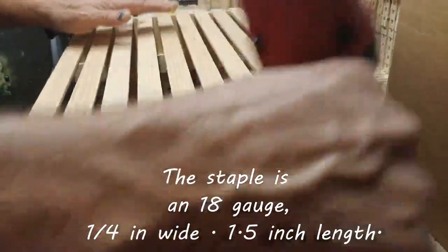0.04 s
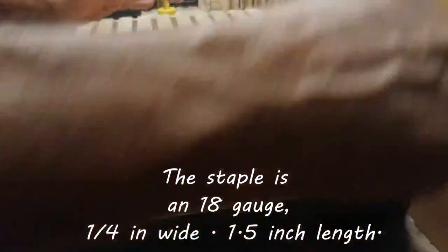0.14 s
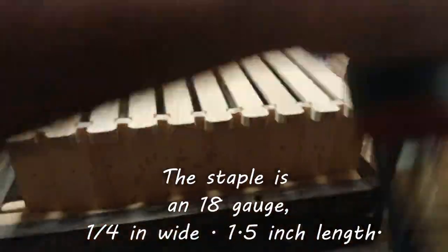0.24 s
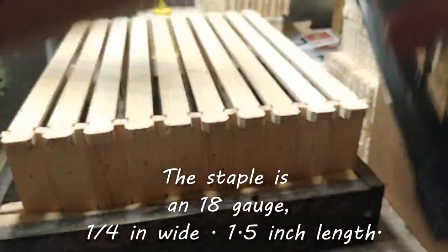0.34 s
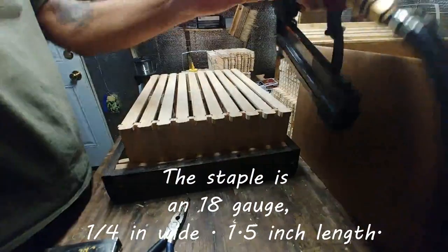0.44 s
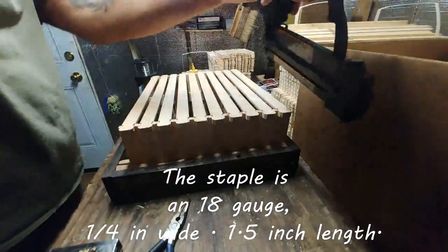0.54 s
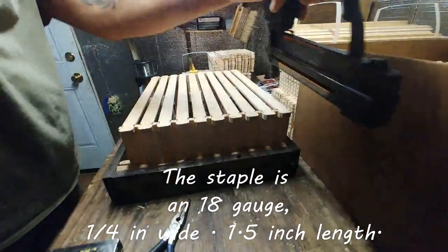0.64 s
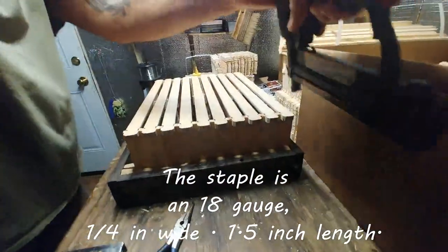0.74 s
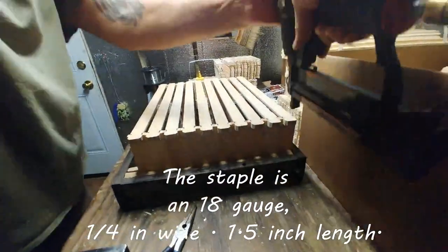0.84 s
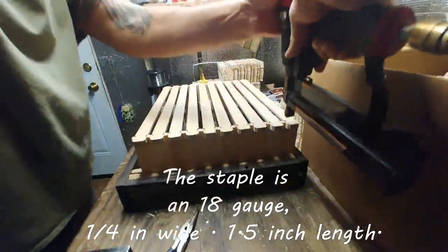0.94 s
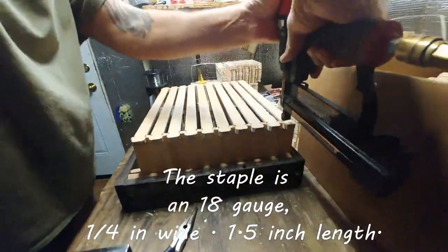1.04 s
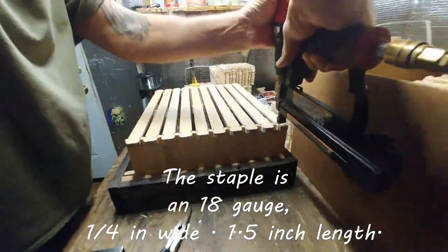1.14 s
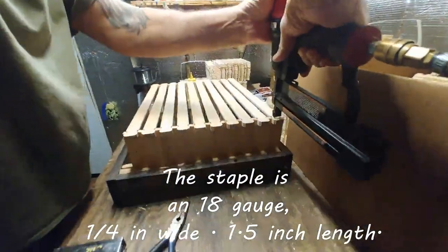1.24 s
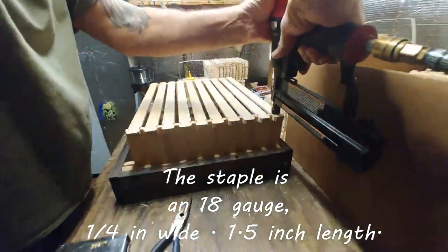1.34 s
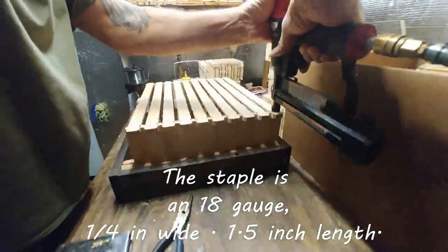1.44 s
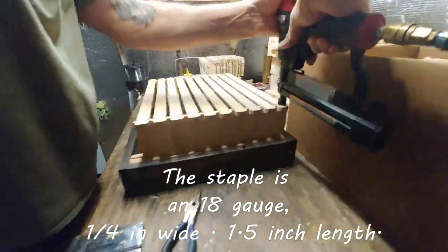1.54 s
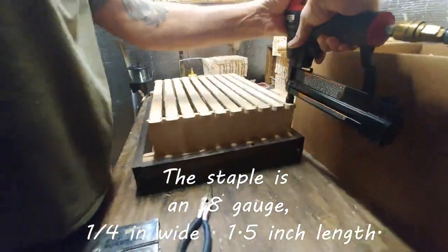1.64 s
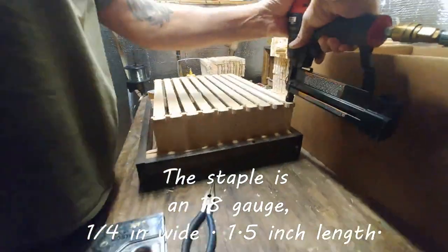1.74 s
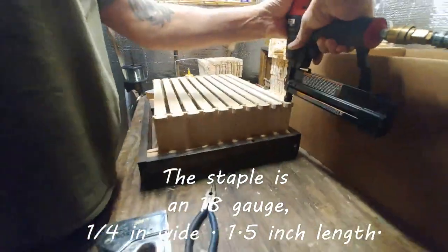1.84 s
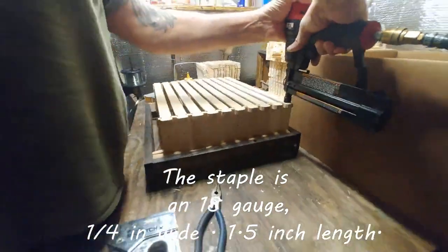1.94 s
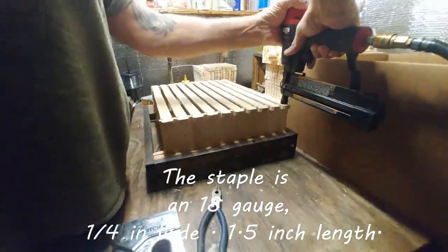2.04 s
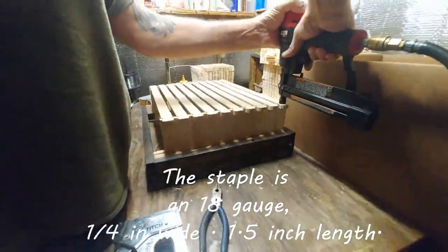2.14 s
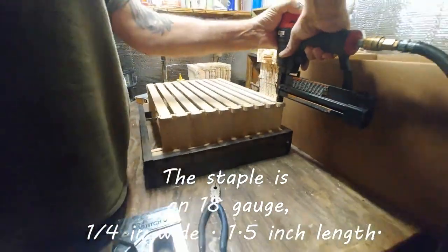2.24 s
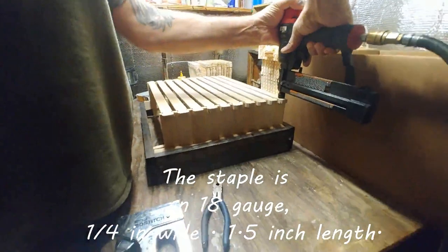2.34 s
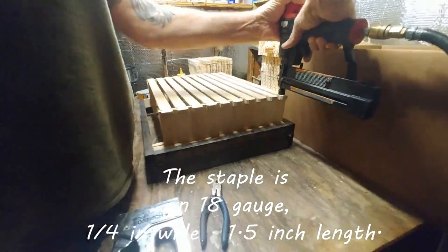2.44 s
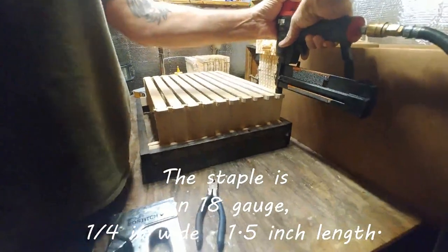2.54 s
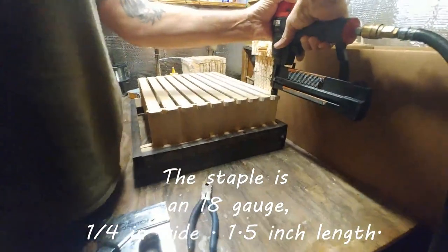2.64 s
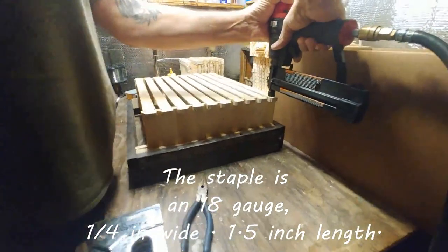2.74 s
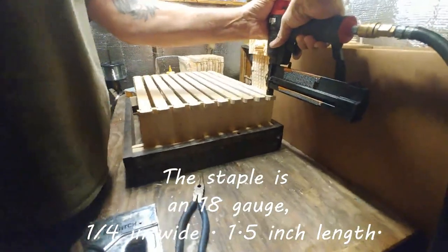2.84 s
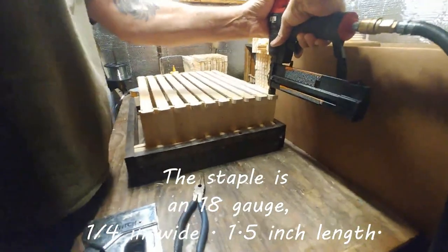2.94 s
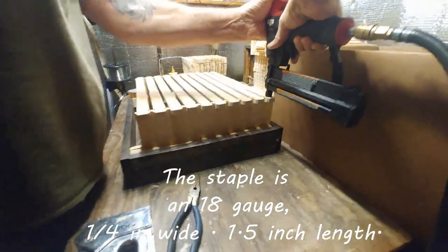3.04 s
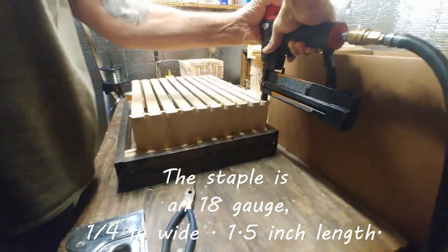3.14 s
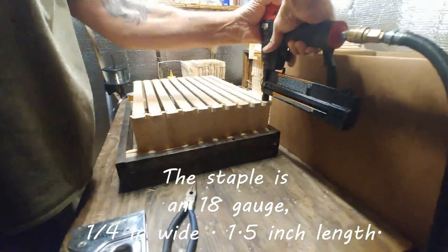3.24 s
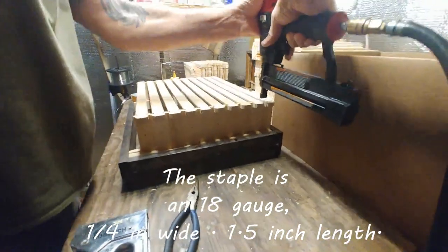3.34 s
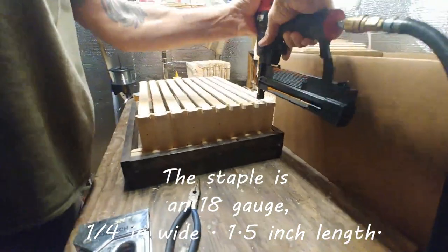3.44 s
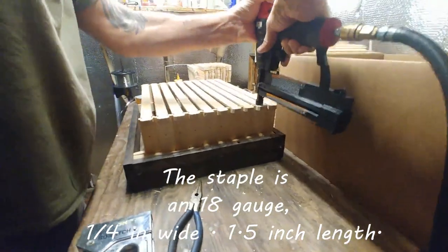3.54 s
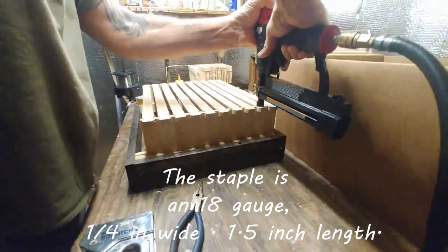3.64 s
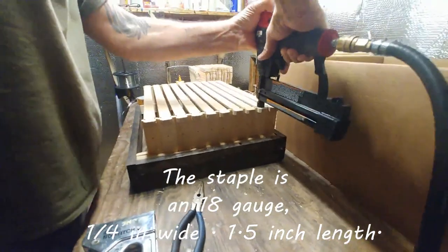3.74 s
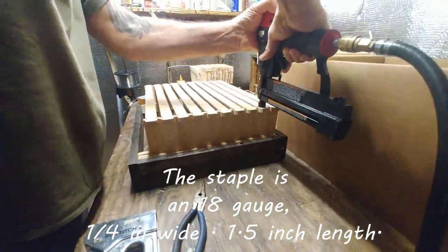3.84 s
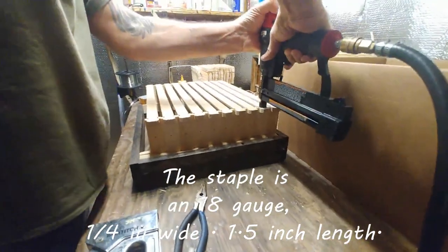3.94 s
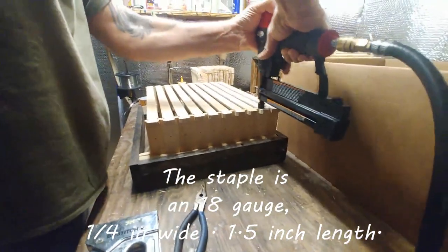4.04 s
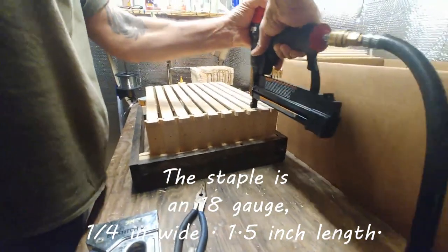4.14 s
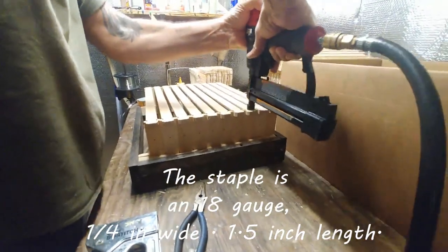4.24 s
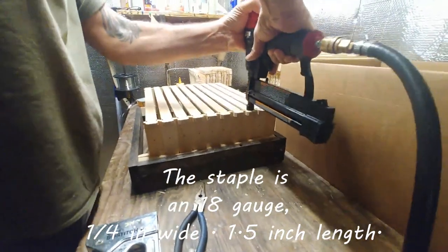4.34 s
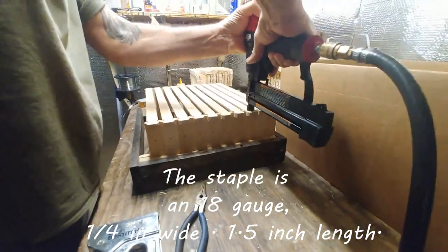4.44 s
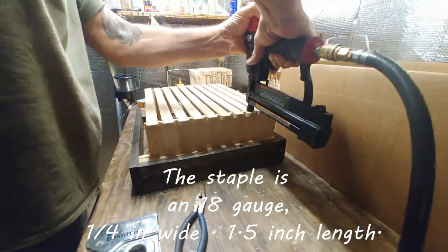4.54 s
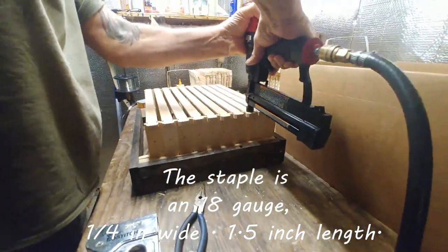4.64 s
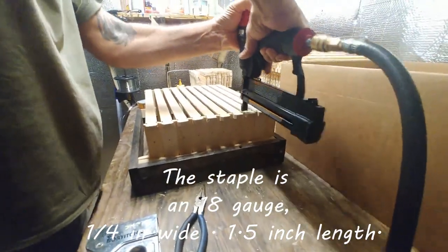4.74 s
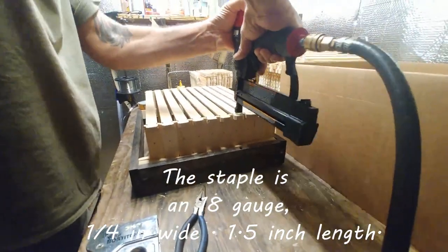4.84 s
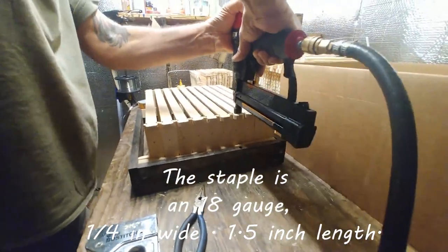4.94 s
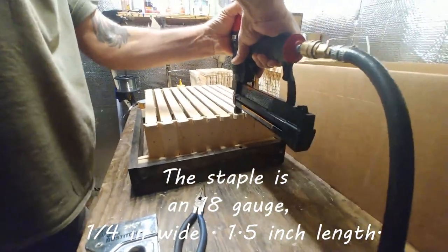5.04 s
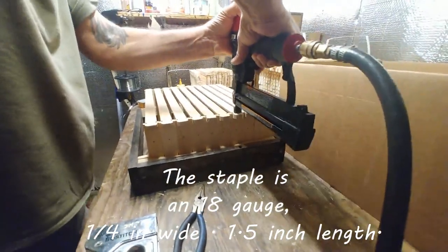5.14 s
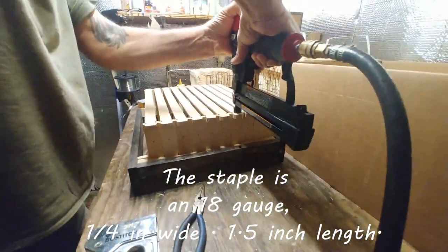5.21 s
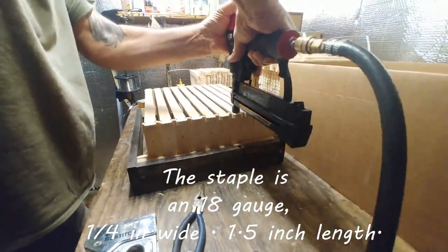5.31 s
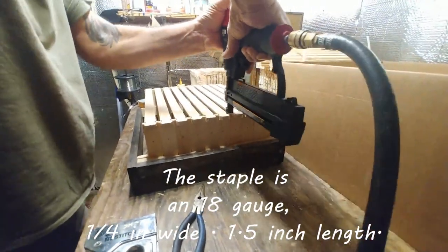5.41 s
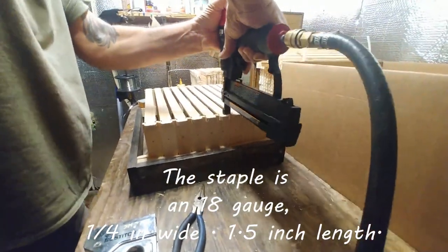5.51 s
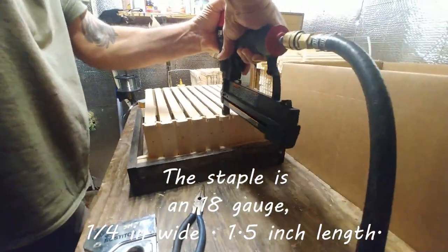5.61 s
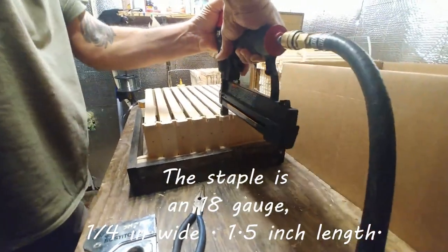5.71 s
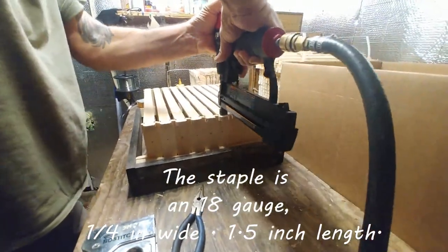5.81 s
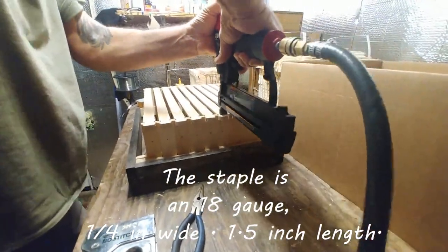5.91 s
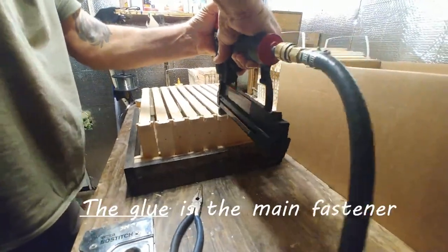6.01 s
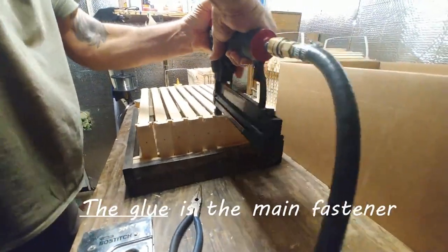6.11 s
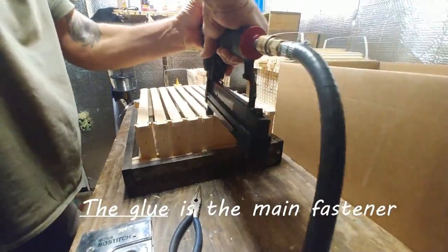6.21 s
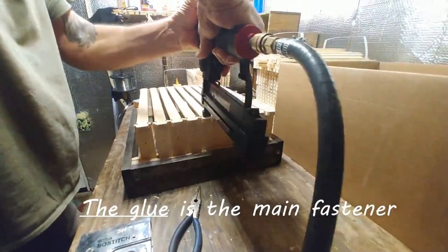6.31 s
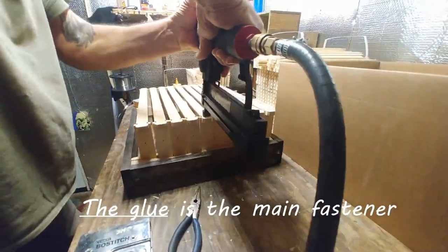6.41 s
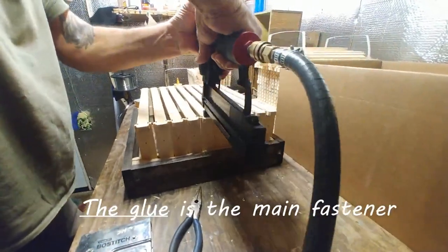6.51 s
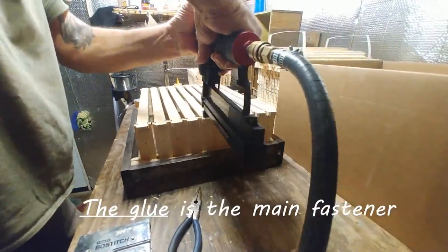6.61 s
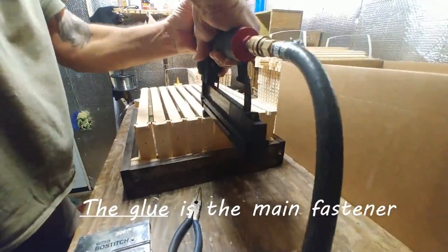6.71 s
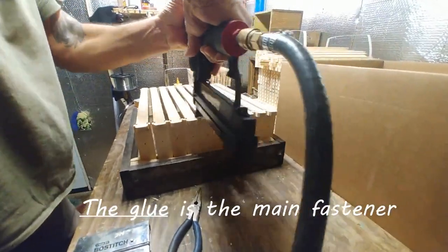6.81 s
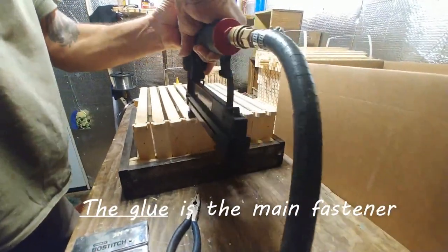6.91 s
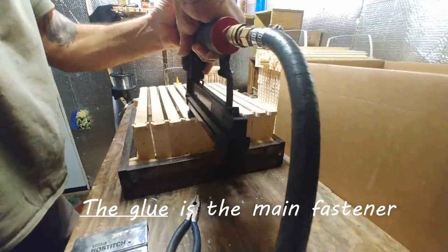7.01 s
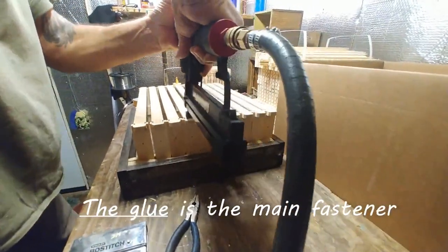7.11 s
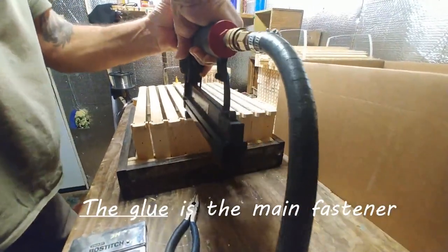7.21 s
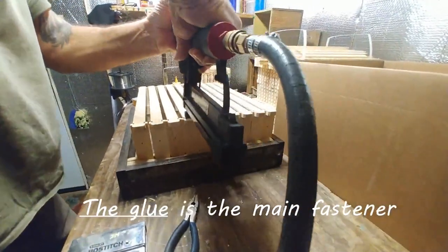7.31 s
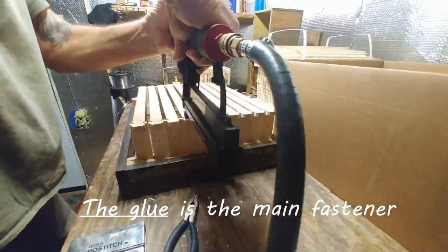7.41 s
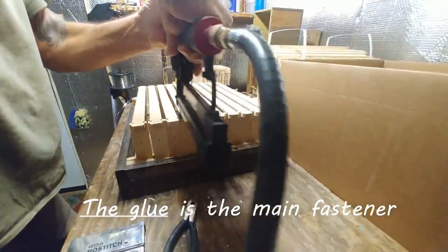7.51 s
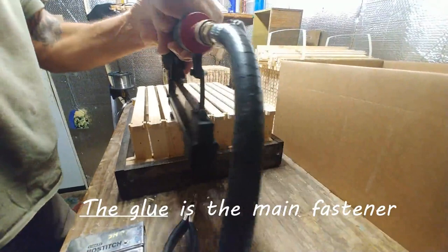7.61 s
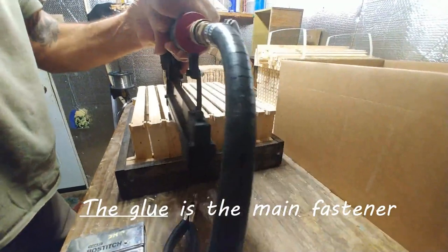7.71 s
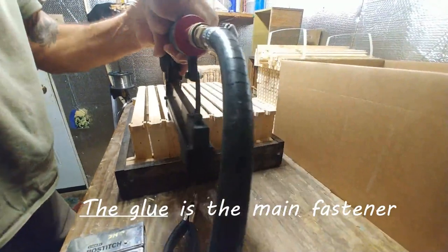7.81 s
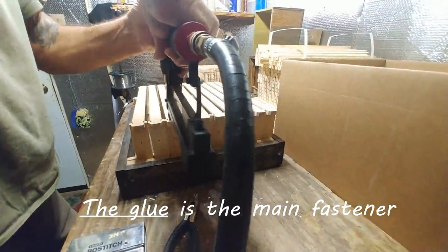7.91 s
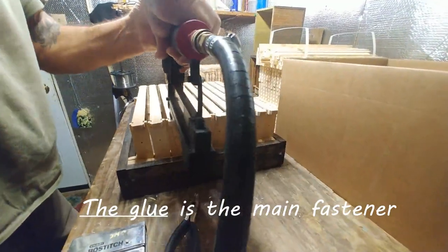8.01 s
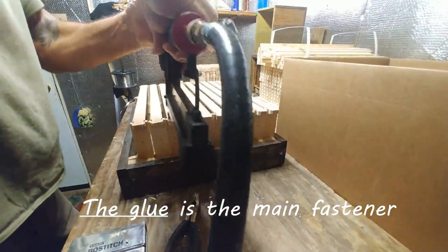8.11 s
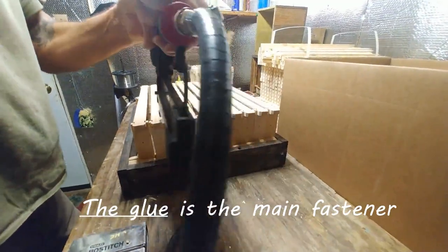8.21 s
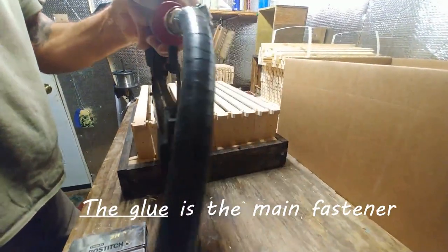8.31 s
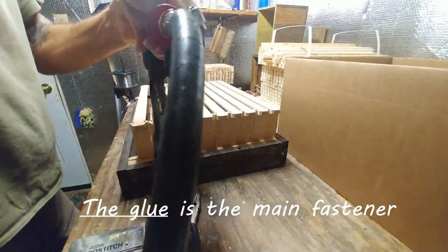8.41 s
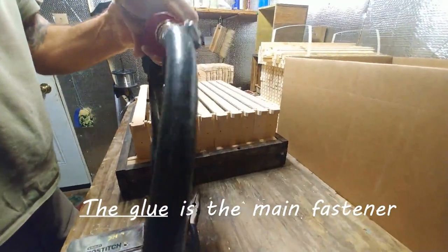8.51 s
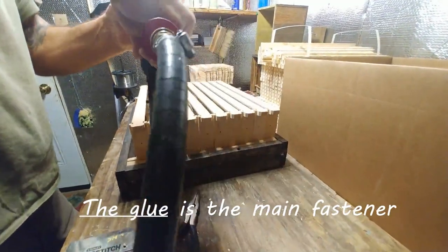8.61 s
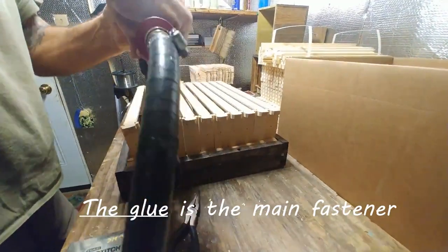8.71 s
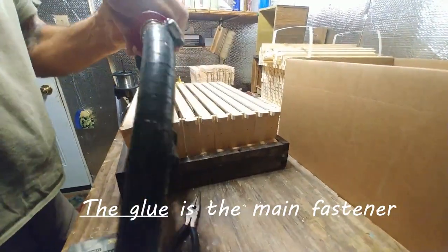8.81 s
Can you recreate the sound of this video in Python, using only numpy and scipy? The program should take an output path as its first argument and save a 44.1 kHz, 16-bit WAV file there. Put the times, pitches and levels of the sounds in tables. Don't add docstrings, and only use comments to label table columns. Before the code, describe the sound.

A heavy tool drags and bumps on a wooden bench, then nine sharp compressed-air staple shots crack into wood, each followed by a short exhaust hiss.

```python
import sys
import numpy as np
from scipy import signal
from scipy.fft import rfft, irfft, next_fast_len
from scipy.io import wavfile

SR = 44100
rng = np.random.default_rng(int(sys.argv[2]) if len(sys.argv) > 2 else 0)


def attenuation_scalar(level_db):
    decades = np.asarray(level_db, float) / 20
    return 10 ** decades


def pcm_store(signal):
    levels = np.round(np.clip(np.atleast_2d(signal), -1, 1) * 32767)
    wavfile.write(sys.argv[1], SR, levels.astype(np.int16).T)


N = 390726

# freq_hz, level_db_per_hz
SHOP_SPECTRUM = [(15, -25.5), (25, -6), (183, -17), (278, -19.5), (548, -24), (593, -21.5), (712, -29),
                 (770, -20.5), (833, -27.5), (5340, -39), (6580, -53), (8330, -47), (13000, -61.5)]
# freq_hz, width_hz, level_db
HUM_BANDS = [(67.4, 14, 2.5), (129, 13, -1.5)]
# time_s, rumble_db
BENCH_LOAD = [
    (0.0, -49.5),
    (0.9, -45),
    (1.1, -60),
    (1.83, -64.5),
    (2.37, -56.5),
    (8.86, -60),
]
# time_s, rub_db
DRAGS = [
    (0.0, -63),
    (0.136, -52.5),
    (0.33, -48),
    (0.405, -41),
    (0.45, -53.5),
    (0.6, -63.5),
    (0.7, -51),
    (0.998, -52.5),
    (1.07, -76),
]
# freq_hz, level_db_per_hz
RUB_SPECTRUM = [(300, -29), (560, -21.5), (750, -10.5), (980, -17.5), (1200, -8.5), (2150, 0), (2800, -8),
                (3400, -3), (3800, -9.5), (4800, -3.5), (6500, -23.5), (7800, -14.5), (11800, -34.5),
                (12800, -62.5)]
# freq_hz, level_db_per_hz
RUMBLE_SPECTRUM = [(15, -42.5), (25, -14.5), (157, 7), (216, -9.5), (338, -4.5), (385, -11.5), (439, -4.5),
                   (1190, -16), (2200, -38), (2860, -53), (4840, -120)]
# freq_hz, width_hz, level_db
SQUEAK_LINES = [(1387, 50, -13), (2223, 28, 1), (2750, 52, -6.5), (3050, 60, -7), (4610, 40, -22),
                (5240, 38, -16)]
# start_s, level_db, pitch_hz, length_s
CREEPS = [(2.19, -59, 2000, 0.065), (5.66, -67, 2300, 0.041), (5.745, -64, 900, .05),
          (5.745, -71, 4600, .04), (5.885, -59, 2300, 0.027), (7.92, -51.5, 800, 0.043),
          (7.93, -69, 2800, 0.021)]
# time_s, tick_peak_db, knock_db, knock_hz, left_right_db
HANDLING = [(0.066, -37, -50.5, 101, 3.5), (0.0856, -38, -39.5, 138.6, -4), (0.249, -35.5, -34, 157, -13.5),
            (0.376, -32.5, -46.5, 448, 1), (0.392, -26, -45.5, 440, -0.5), (0.4104, -27.5, -59, 129, -6.5),
            (0.456, -40, -29, 364.5, -2.5), (0.4697, -43, -31.5, 158.3, 5),
            (0.5287, -46, -31.5, 159.4, 1.5), (0.6317, -40, -34, 413, 11.5),
            (0.709, -37.5, -35, 104.3, -12), (1.01, -35, -47.5, 120.4, 7), (1.21, -54, -61.5, 137.6, 7),
            (1.497, -50, -47, 442, -10)]
# time_s, tick_peak_db, knock_db, knock_hz
NUDGES = [(1.4564, -60, -49.5, 440), (2.0672, -28.5, -47.5, 534), (2.2759, -23.5, -31, 121.4),
          (2.2838, -26.5, -45, 302), (2.3074, -35, -52, 129), (2.5221, -24.5, -47.5, 780),
          (2.7581, -29, -41, 463), (2.7759, -30, -56, 450), (2.8385, -21.5, -56.5, 739),
          (2.8515, -32.5, -61, 172.3), (3.0665, -40.5, -39.5, 634), (3.0758, -39.5, -38, 431),
          (3.7913, -54.5, -40, 102), (3.8062, -61, -47, 126.2), (5.1613, -32.5, -40.5, 136),
          (5.1958, -41.5, -44, 401.7), (5.75, -54, -55.5, 118.4), (5.883, -51, -64.5, 299),
          (5.9043, -49.5, -55, 153.5), (5.939, -35.5, -37.5, 302.3), (5.952, -29, -41.5, 129),
          (6.5395, -40.5, -48, 101), (7.2554, -50.5, -47.5, 300.5), (7.3557, -55, -55, 174.4),
          (7.9892, -36, -43, 414), (8.5144, -38.5, -79.5, 132), (8.6063, -30.5, -40, 118.8),
          (8.6241, -32, -40.5, 484), (8.677, -41.5, -59, 300)]
# time_s, tick_peak_db, knock_db, knock_hz
LANDINGS = [(1.4749, -30, -43.5, 1250), (3.711, -44, -43.5, 130), (4.4836, -31.5, -30.5, 266),
            (4.5144, -30.5, -41.5, 134), (5.1412, -23, -33, 310), (5.9215, -19.5, -29.5, 102.5),
            (6.57, -24, -30.5, 162.2), (7.1989, -52, -55, 121.2), (7.9616, -23.5, -33, 320),
            (8.4961, -38, -44, 116.5)]
# time_s, tick_peak_db, tick_hz, knock_db
CATCHES = [(0.8, -25.5, 5710, -63), (1.6602, -62.5, 5600, -78), (1.8851, -55, 8350, -76.5),
           (1.4741, -32.5, 3250, -59), (1.995, -60, 5200, -75), (2.1392, -40.5, 5540, -60),
           (2.155, -56, 5400, -70.5), (2.268, -43, 7500, -68.5), (2.824, -40.5, 2860, -63),
           (2.9648, -58.5, 8070, -64.5), (2.978, -58.5, 5000, -61.5), (3.1074, -19, 7800, -51),
           (3.1622, -32, 3040, -55), (3.1704, -19, 3130, -41), (3.5874, -51, 4400, -65.5),
           (3.6394, -32.5, 3930, -45), (3.652, -42.5, 3820, -53), (3.693, -38, 5700, -52),
           (3.913, -31, 3060, -57), (4.3155, -29.5, 4190, -47), (4.998, -31, 3670, -46),
           (5.5755, -34, 1765, -53), (6.3600, -34, 3680, -51.5), (6.451, -51.5, 5480, -59.5),
           (6.527, -52, 4500, -70.5), (6.562, -49.5, 8500, -72), (6.586, -46, 8560, -71),
           (6.635, -45, 5500, -69), (7.269, -40, 3800, -62), (7.753, -34, 3600, -58.5),
           (7.9043, -57, 3580, -58.5)]
# freq_hz, level_db_per_hz
GRIT_SPECTRUM = [(150, -11), (1000, -1.5), (2500, 0.5), (5000, -1), (6500, -10), (8300, -8), (11500, -9.5),
                 (12600, -42.5)]
# freq_hz, width_hz, level_db
STEEL_LINES = [(1150, 120, -5), (2330, 510, -1.5), (3510, 360, -3), (4400, 420, -3.5), (5600, 520, 0.5),
               (8400, 500, -6.5), (9600, 500, -9.5)]
# freq_hz, level_db, t60_s
BENCH_MODES = [(65, -16.5, .16), (129, -8.5, .15)]
# time_s, peak_db, freq_hz, t60_s
BUMPS = [(0.088, -34.5, 454, 0.08), (0.089, -40.5, 893, .05), (0.2505, -37, 807, 0.037),
         (0.457, -35, 708, 0.078), (0.460, -39.5, 949, 0.05), (0.531, -42.5, 1948, 0.059),
         (0.545, -37, 699, .07), (0.633, -36.5, 498, 0.082), (0.9785, -30.5, 2300, 0.0021),
         (2.7612, -37.5, 698, .04), (3.074, -35, 800, 0.035), (4.4838, -35.5, 602, .04),
         (0.458, -31.5, 258, 0.37), (0.471, -24.5, 163, 0.35), (0.531, -31.5, 123.3, 0.52),
         (0.532, -45.5, 1346, 0.11), (0.635, -44.5, 1150, 0.12), (0.715, -19, 71, 0.045),
         (0.9791, -18.5, 1080, 0.0036), (2.2745, -26.5, 129, 0.22), (2.2770, -26.5, 288, 0.095),
         (2.2775, -35, 440, 0.092), (2.761, -35.5, 422, 0.12), (3.0727, -32, 439, 0.082),
         (3.0750, -32, 1990, 0.028)]
# blow_s, blow_db, staple_lead_ms, squeal_hz, stroke_ms
SHOTS = [
    (3.2247, -4, 8.3, 4790, 2.3),
    (3.9754, -4.5, 6.7, 3700, 3.9),
    (4.6087, -5, 6.7, 4520, 6.1),
    (5.2375, -5, 6.0, 3630, 4.2),
    (6.0135, -6, 7.7, 3750, 5.1),
    (6.6686, -6, 7.3, 3430, 4.5),
    (7.4029, -5.5, 6.8, 3150, 4.1),
    (8.0354, -5, 7, 3340, 5.4),
    (8.7170, -5.5, 6.36, 3230, 7.6),
]
# freq_hz, level_db_per_hz
AIR_SPECTRUM = [(180, -46), (300, -14.5), (885, -9), (1040, -8), (1410, -4), (2360, -5.5), (2880, -4),
                (3760, -2.5), (4670, -4.5), (6740, -11.5), (8360, -7), (12100, -15), (12900, -22),
                (15000, -21), (16000, -36)]
# freq_hz, level_db_per_hz
RATTLE_SPECTRUM = [(88, -32.5), (150, -4.5), (675, -7.5), (905, -5.5), (1720, -8.5), (1940, -5.5),
                   (2810, -11.5), (4670, -12), (6390, -24), (8730, -18), (11700, -24), (13200, -53.5),
                   (14000, -37), (16000, -48.5)]
# freq_hz, width_hz, level_db
FRAME_LINES = [(1070, 150, -1), (1290, 100, -2), (2050, 250, -4), (3420, 150, 2), (4260, 200, 1),
               (4670, 100, 0)]
# freq_hz, level_db, t60_s
JIG_MODES = [(129, -4.5, 0.49), (188, -8.5, 0.11), (263, -12.5, 0.087), (310, -4.5, 0.2),
             (406.3, -2.5, 0.28), (607, -13.5, .07), (780, -12.5, 0.038), (862, -5.5, .09),
             (1240, -12.5, 0.083), (1290, -9.5, .08)]
# freq_hz, level_db, t60_s
MAGAZINE_MODES = [(904, -56, 1.7), (1135, -54, 2.0), (1765, -58, 1.0), (3460, -58.5, 1.7), (3520, -57, 1.0),
                  (4320, -58, .8)]
# release_s, hiss_db, piston_return_ms, return_click_db
EXHAUSTS = [
    (3.316, -21, 48.6, -32.5),
    (4.091, -20, 45.6, -23),
    (4.719, -20.5, 42.5, -28.5),
    (5.366, -21, 42, -32),
    (6.122, -20.5, 44, -34),
    (6.803, -20, 40, -25),
    (7.534, -21.5, 42, -25.5),
    (8.143, -21, 42.2, -24.5),
    (8.842, -19.5, 44, -22),
]
# freq_hz, width_hz, level_db
PORT_LINES = [(1090, 140, 0.5), (2320, 120, 2), (3750, 170, 1.5), (4567, 120, 2.5), (5400, 390, -2),
              (7960, 250, 0), (8950, 130, -1)]
# freq_hz, t60_s
ROOM_T60 = [(100, 0.35), (500, 0.3), (2000, 0.24), (5000, 0.16), (10000, 0.13)]
# freq_hz, likeness_0_to_1
LIKENESS = [(60, 1), (250, 0.4), (700, 0.88), (1500, 0.13), (3000, 0.15), (12000, 0.11)]
# freq_hz, left_right_db
PORT_BALANCE = [(60, -5), (110, -1), (200, 0.5), (380, 1.5), (700, -1), (1290, 2), (2380, -6.5),
                (4400, 1.5), (8120, 11), (15000, 0.5)]
# freq_hz, level_db
MIC_TOP = [(12000, -0.5), (12600, -2.5), (16000, -4)]

SHOP_DB = -55.5
SHAKE_DB, SHAKE_HOLD_S, SHAKE_T60_S = -55, 0.13, 0.79
RUMBLE_OVER_RUB_DB = 2.5
SQUEAK_S, SQUEAK_DB = 0.4, -20.5
SLIDE_START_S, SLIDE_START_DB = 2.47, -47
SLIDE_S, SLIDE_DB, SLIDE_RISE_S, SLIDE_HOLD_S, SLIDE_T60_S = 2.525, -35, 0.1, 0.21, 0.2
BODY_TICK_HZ, NOSE_TICK_HZ, FRAME_KNOCK_HZ = 2130, 4400, 410
LANDING_LATE_S = 0.0051
CENTRE_S, JET_PAN_DB_PER_S, NOSE_PAN_DB_PER_S, SETUP_PAN_DB = 6.1, -1.1, -1.5, 2
STAPLE_DB, STAPLE_DB_PER_MS = -6.5, -0.59
PORT_LAG_MS, PORT_LAG_GROWS_MS, PORT_LAG_POWER = 0.02, 0.205, 2.3
LEAK_FROM_S, LEAK_TO_S, LEAK_DB = 7.41, 7.54, -31
BASS_LEAD_RAD, BASS_LEAD_HZ = 1.6, 130


def at_hz(points, hz):
    table_hz, value = np.array(points).T
    return np.interp(np.log(hz + 1), np.log(table_hz), value)


def gain_curve(rows, column):
    rows = np.array(rows)
    return attenuation_scalar(np.interp(np.arange(N) / SR, rows[:, 0], rows[:, column], left=-150, right=-150))


def noise(spectrum):
    size = next_fast_len(N)
    hz = np.arange(size // 2 + 1) * SR / size
    mid, side = rfft(rng.standard_normal((2, size))) * attenuation_scalar(at_hz(spectrum, hz))
    alike = np.clip(at_hz(LIKENESS, hz), 0, 1)
    out = irfft(np.sqrt(1 + alike) * mid + np.sqrt(1 - alike) * side * [[1], [-1]], size)[:, :N]
    return out / np.std(out)


def swell(s, rise_s, hold_s, t60_s):
    out = np.zeros(N)
    part = slice(max(int((s - 0.2) * SR), 0), int((s + 0.7) * SR))
    t = np.arange(N)[part] / SR - s
    out[part] = attenuation_scalar(60 * np.minimum(0, np.minimum(t / rise_s, (hold_s - t) / t60_s)))
    return out


def flutter(per_s, depth_db):
    knots = rng.standard_normal(int(N / SR * 400) + 2)
    where = np.arange(N) / SR * np.clip(per_s, 1, 399)
    return attenuation_scalar(depth_db * np.interp(where, np.arange(len(knots)), knots))


def lowpass(x, hz):
    return signal.sosfilt(signal.butter(2, hz, fs=SR, output="sos"), x)


def resonate(x, hz, width_hz):
    r = np.exp(-np.pi * width_hz / SR)
    feedback = [1, -2 * r * np.cos(2 * np.pi * hz / SR), r * r]
    return signal.lfilter([(1 - r * r) / 2, 0, (r * r - 1) / 2], feedback, x)


def ringing(x, lines, per_s, depth_db):
    return x + sum(attenuation_scalar(db) * flutter(per_s, depth_db) * resonate(x, hz, width_hz)
                   for hz, width_hz, db in lines)


def strike(modes, times_s, levels_db, spread_db):
    at, out = (np.array(times_s) * SR).astype(int), 0
    luck = rng.standard_normal((len(at), len(modes)))
    for k, (hz, level_db, t60_s) in enumerate(modes):
        clicks = np.full(N, 1e-18)
        clicks[at] = attenuation_scalar(np.array(levels_db) + level_db + spread_db * luck[:, k])
        r, w = attenuation_scalar(-60 / (t60_s * SR)), 2 * np.pi * hz / SR
        sign = (-1) ** (k + 1)
        out = out + signal.lfilter([0, sign * np.sin(w)], [1, -2 * r * np.cos(w), r * r], clicks)
    return out


def panned(left_right_db):
    return attenuation_scalar([[left_right_db / 2], [-left_right_db / 2]])


def walk(s, pan_db_per_s):
    return pan_db_per_s * (s - CENTRE_S) if s > SHOTS[0][0] else SETUP_PAN_DB


def background():
    white = noise([(20, 0), (400, 0), (500, -40)])
    hum = sum(attenuation_scalar(db) * resonate(resonate(white, hz, width_hz), hz, width_hz)
              for hz, width_hz, db in HUM_BANDS)
    shake = sum(attenuation_scalar(SHAKE_DB) * swell(row[0], 0.05, SHAKE_HOLD_S, SHAKE_T60_S) for row in SHOTS)
    air = attenuation_scalar(SHOP_DB - 7.5) * flutter(6.7, 1.4) * noise(SHOP_SPECTRUM)
    return air + (gain_curve(BENCH_LOAD, 1) + shake) * hum / np.std(hum)


def drags():
    pressure = gain_curve(DRAGS, 1)
    slide = attenuation_scalar(SLIDE_DB) * swell(SLIDE_S, SLIDE_RISE_S, SLIDE_HOLD_S, SLIDE_T60_S)
    rub = pressure * flutter(30, 3.6) * flutter(350, 2.8) + slide * flutter(150, 0.82)
    start = attenuation_scalar(SLIDE_START_DB) * swell(SLIDE_START_S, 0.21, 0.064, 0.1) * lowpass(noise(RUB_SPECTRUM), 4500)
    rumble = attenuation_scalar(RUMBLE_OVER_RUB_DB) * pressure * flutter(25, 4.5)
    white = rng.standard_normal((2, N))
    squeak_lines = ringing(white, SQUEAK_LINES, 20, depth_db=3.5) - white
    squeak = attenuation_scalar(SQUEAK_DB) * swell(SQUEAK_S, 0.75, 0.025, 0.2) * squeak_lines
    creep = sum(attenuation_scalar(db + 7.5) * swell(s, 0.1, length_s, 0.09) * resonate(white, hz, 0.3 * hz)
                for s, db, hz, length_s in CREEPS)
    return (squeak + creep * flutter(60, 3.7) + start
            + rub * noise(RUB_SPECTRUM) + rumble * noise(RUMBLE_SPECTRUM))


def touches():
    rows = [(s, tick, BODY_TICK_HZ, knock, hz, pan, 0) for s, tick, knock, hz, pan in HANDLING]
    rows += [(s, tick, BODY_TICK_HZ, knock, hz, walk(s, NOSE_PAN_DB_PER_S), 0)
             for s, tick, knock, hz in NUDGES]
    rows += [(s, tick, NOSE_TICK_HZ, knock, hz, walk(s, NOSE_PAN_DB_PER_S), LANDING_LATE_S)
             for s, tick, knock, hz in LANDINGS]
    rows += [(s, tick, hz, knock, FRAME_KNOCK_HZ, walk(s, NOSE_PAN_DB_PER_S), 0)
             for s, tick, hz, knock in CATCHES]
    return rows


def contacts():
    out, all_grit = np.zeros((2, N)), noise(GRIT_SPECTRUM)
    all_dull = noise([(60, 4.5), (150, 1.5), (1500, -10.5), (4000, -43.0)])
    rows = touches()
    luck = rng.standard_normal((len(rows), len(STEEL_LINES)))
    for row, (s, tick_db, tick_hz, knock_db, knock_hz, pan_db, late_s) in enumerate(rows):
        part = slice(int((s - 0.005) * SR), int((s + 0.25) * SR))
        grit, dull = all_grit[:, part], all_dull[:, part]
        steel = sum(attenuation_scalar(db + 7.5 * luck[row, k]) * resonate(grit, hz, width_hz)
                    for k, (hz, width_hz, db) in enumerate(STEEL_LINES))
        tick = resonate(grit, tick_hz, 0.38 * tick_hz) + 0.6 * steel + 0.44 * grit
        top_hz = np.clip(tick_hz * attenuation_scalar(0.25 * (tick_db + 70)), 2500, 17000)
        tick = signal.lfilter(*signal.butter(2, top_hz, fs=SR), tick)
        knock = resonate(dull, knock_hz, 0.19 * knock_hz) + 0.3 * dull
        shape = swell(s + late_s + 0.0006, 0.0035 + 4.0 * late_s, 0.0009, 0.02)
        shape += attenuation_scalar(-16) * swell(s + late_s + 0.0032, 0.004, 0.002, 0.085)
        thud = swell(s + 0.0024, 0.0053, 0.002, 0.071 + 14 / knock_hz)
        out[:, part] += attenuation_scalar(tick_db - 7.5) * panned(pan_db) * shape[part] * tick / np.std(tick)
        out[:, part] += attenuation_scalar(knock_db) * thud[part] * knock / np.std(knock)
    rows = np.array(rows)
    bench_db = rows[:, 3] + 2 - 12 * np.log2(rows[:, 4] / 130)
    return out + strike(BENCH_MODES, rows[:, 0], bench_db, spread_db=-3.0)


def bumps():
    rings = sum(strike([(hz, peak_db, t60_s)], [s], [0], spread_db=0.5) for s, peak_db, hz, t60_s in BUMPS)
    return signal.lfilter([0.3], [1, -0.7], rings)


def staple(squeal_hz, stroke_ms, start_s, part):
    grit = rng.standard_normal((3, part.stop - part.start))
    grit = grit[:2] + 0.67 * grit[2]
    entry = swell(start_s, 0.0039, stroke_ms / 2500, 0.0042 * stroke_ms)[part]
    drive = swell(start_s + stroke_ms / 1500, 0.019, 0.0005, 0.0066)[part]
    blade = 0.21 * np.sin(2 * np.pi * squeal_hz * np.arange(grit.shape[1]) / SR)
    squeal = blade + resonate(grit, squeal_hz, 450) + 0.05 * resonate(grit, 1.3 * squeal_hz, 2300)
    squeal = entry * squeal + 0.5 * drive * resonate(grit, 0.73 * squeal_hz, 800)
    return attenuation_scalar(STAPLE_DB + STAPLE_DB_PER_MS * stroke_ms + 8) * squeal / np.abs(squeal).max()


def piston(times_s, blows_db):
    along = (times_s - times_s[0]) / (times_s[-1] - times_s[0])
    lag_s = (PORT_LAG_MS + PORT_LAG_GROWS_MS * along ** PORT_LAG_POWER) / 1000
    out, luck_db = np.zeros((2, N)), rng.standard_normal((len(times_s), 4))
    # late_s, freq_hz, level_db, t60_s
    parts = [(-0.00045, 1080, 3, 0.007), (-0.00011, 2150, 6.5, 0.006),
             (0.00355, 1100, 1, 0.003), (0.00395, 2700, 5, 0.0025)]
    for k, (late_s, hz, level_db, t60_s) in enumerate(parts):
        for side in range(2):
            arrival_s = times_s + late_s + (side - 0.5) * lag_s
            out[side] += strike([(hz, level_db, t60_s)], arrival_s, blows_db + 1.0 * luck_db[:, k], spread_db=2)
    bumper = np.hanning(13)
    return signal.lfilter(bumper / bumper.sum(), [1], out)


def shots():
    out, rattle, spray, hiss = np.zeros((2, N)), 0, 0, 0
    for s, blow_db, lead_ms, squeal_hz, stroke_ms in SHOTS:
        start_s = s - lead_ms / 1000
        hiss = hiss + attenuation_scalar(-37.5) * swell(start_s - 0.003, 0.054, 0.0013, 0.004)
        part = slice(int((start_s - 0.02) * SR), int((s + 0.02) * SR))
        out[:, part] += staple(squeal_hz, stroke_ms, start_s, part)
        rattle = rattle + attenuation_scalar(blow_db - 13.0) * swell(s + 0.0025, 0.03, 0.005, 0.23)
        spray = spray + attenuation_scalar(blow_db - 11.5) * swell(s + 0.0024, 0.0048, 0.0063, 0.04)
    times_s, blows_db, leads_ms = np.array(SHOTS)[:, :3].T
    puff = strike([(258, -11.5, 0.012)], times_s - leads_ms / 1000 - 0.002, blows_db, spread_db=2.5)
    body = strike(JIG_MODES, times_s, blows_db - 17, spread_db=2.0) * flutter(70, 3.5)
    body += strike(MAGAZINE_MODES, times_s, blows_db - 2.0, spread_db=3.5) * flutter(14, 6.0)
    valve = lowpass(hiss * noise(AIR_SPECTRUM), 6000)
    frames = rattle * flutter(300, 2.9) * ringing(noise(RATTLE_SPECTRUM), FRAME_LINES, 70, depth_db=3.0)
    return out + piston(times_s, blows_db) + puff + body + frames + valve + spray * noise(AIR_SPECTRUM)


def exhausts():
    jet, home = 0, 0
    for s, hiss_db, return_ms, click_db in EXHAUSTS:
        return_s = return_ms / 1000
        flow = swell(s + 0.0045, 0.03, return_s, 0.062) * swell(s + 0.0086, 0.03, 0.015, 0.24)
        flow += attenuation_scalar(-7.0) * swell(s + 0.0056, 0.022, return_s, 0.29)
        jet = jet + attenuation_scalar(hiss_db) * panned(walk(s, JET_PAN_DB_PER_S)) * flow
        home = home + attenuation_scalar(click_db) * swell(s + return_s, 0.0045, 0.00067, 0.038)
    times_s = np.array(EXHAUSTS)[:, 0]
    pop = -strike([(134, -17, 0.041), (335, -29.5, 0.058)], times_s - 0.001, 0 * times_s, spread_db=-2.5)
    thin_air = signal.lfilter([1, -0.7], [1], noise(AIR_SPECTRUM))
    leak = attenuation_scalar(LEAK_DB + 7.0) * swell(LEAK_FROM_S, 0.011, LEAK_TO_S - LEAK_FROM_S, 0.01) * thin_air
    jet = jet * flutter(300, 2.0) * flutter(70, 1.5) * attenuation_scalar(-1.5)
    whistle = ringing(noise(AIR_SPECTRUM), PORT_LINES, 60, depth_db=3.0)
    return jet * whistle + home * noise(RATTLE_SPECTRUM) + pop + leak


def workshop(x):
    t = np.arange(SR) / SR
    white, tail = noise([(20, 0), (20000, 0)])[:, :SR], 0
    for low_hz in 40 * 2. ** np.arange(8.5):
        octave = signal.butter(2, [low_hz, min(2 * low_hz, 19000)], "band", fs=SR, output="sos")
        tail = tail + signal.sosfilt(octave, white) * attenuation_scalar(-60 * t / at_hz(ROOM_T60, low_hz * np.sqrt(2)))
    tail *= np.clip((t - 0.005) / 0.0014, 0, 1)
    tail /= np.sqrt(np.sum(tail ** 2) / 2)
    return signal.fftconvolve(x.mean(axis=0)[None], tail, axes=1)[:, :N]


def scene():
    no_deep_bass = signal.butter(2, 75, "high", fs=SR, output="sos")
    blows = signal.sosfilt(no_deep_bass, shots() + exhausts())
    work = blows + contacts() + bumps() + drags()
    return work + attenuation_scalar(-12.5) * workshop(work) + background()


def roll_off(x):
    return signal.sosfilt(signal.butter(12, 16390, fs=SR, output="sos"), x)


def record(dry):
    size = next_fast_len(N)
    hz = np.arange(size // 2 + 1) * SR / size
    tilt_db = 0.8 * at_hz(PORT_BALANCE, hz)
    lead_rad = BASS_LEAD_RAD / (1 + (BASS_LEAD_HZ / (hz + 1)) ** -2)
    gain = attenuation_scalar(at_hz(MIC_TOP, hz) + tilt_db / 2 * [[1], [-1]])
    turn = np.exp(1j * lead_rad / 2 * [[1], [-1]])
    ports = irfft(rfft(dry, size) * gain * turn, size)[:, :N]
    mix = ports / (1 + np.abs(ports) ** 8) ** (1 / 8)
    return roll_off(mix)


dry = scene()
out = record(dry)
pcm_store(out)
```